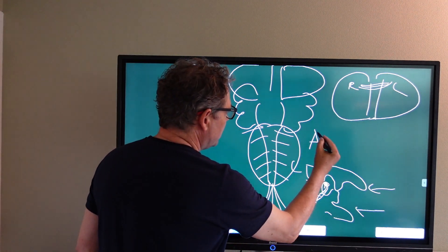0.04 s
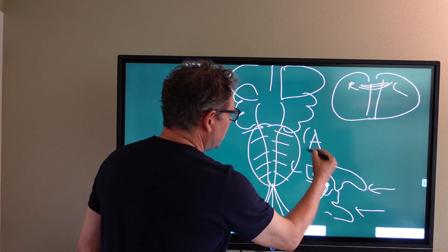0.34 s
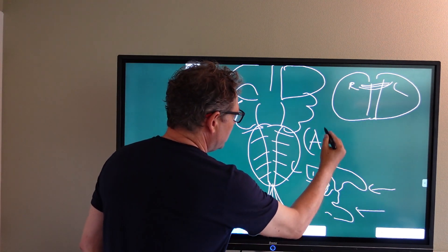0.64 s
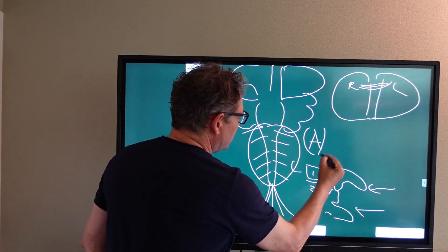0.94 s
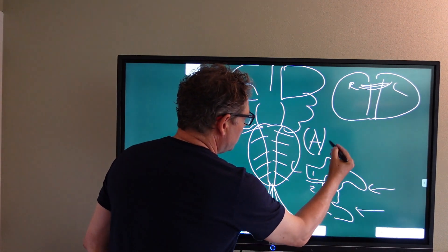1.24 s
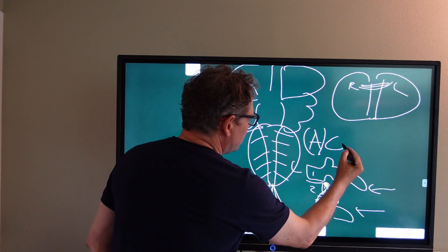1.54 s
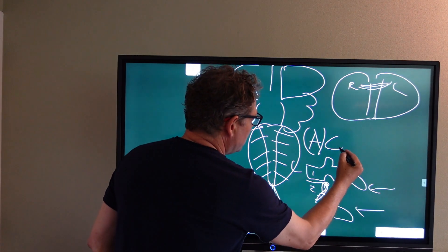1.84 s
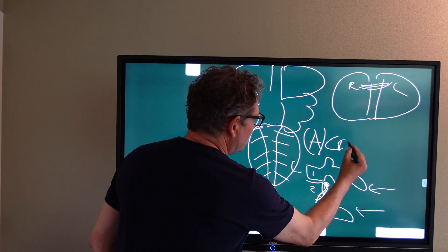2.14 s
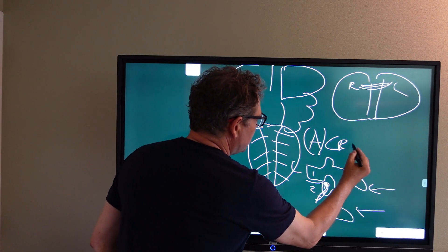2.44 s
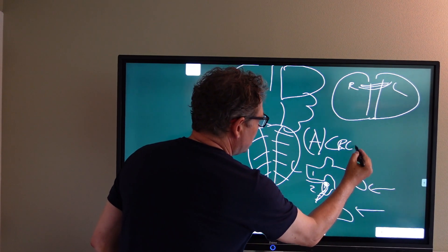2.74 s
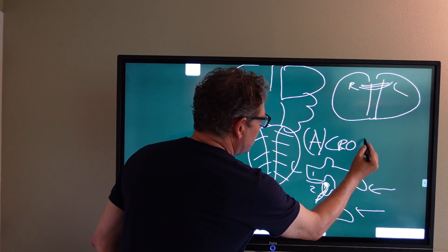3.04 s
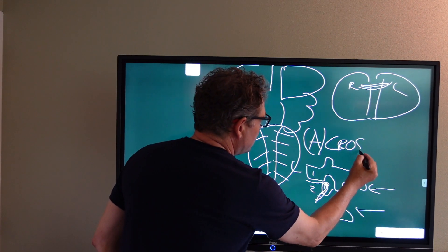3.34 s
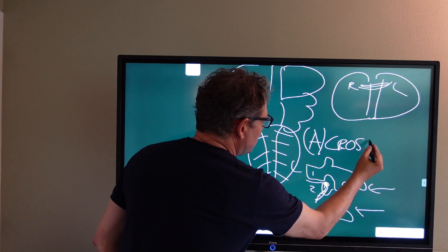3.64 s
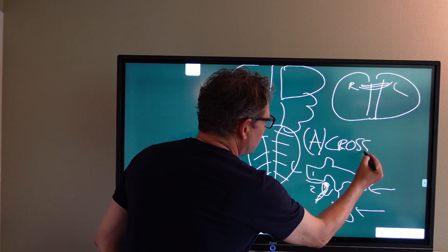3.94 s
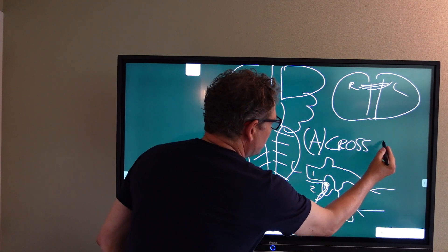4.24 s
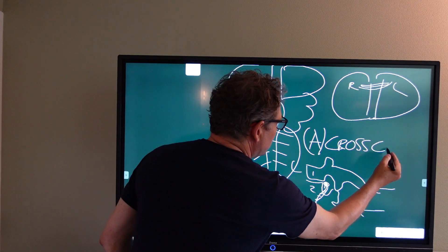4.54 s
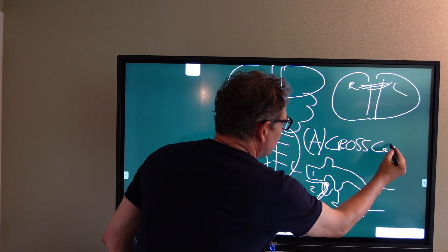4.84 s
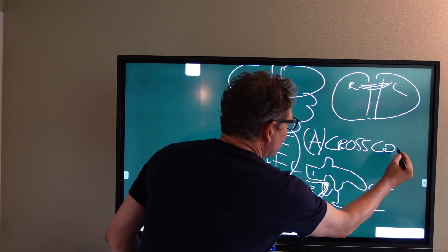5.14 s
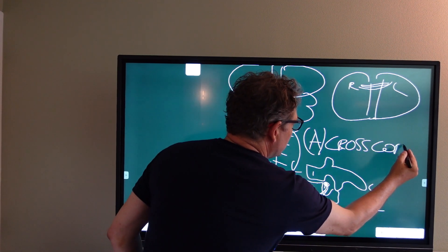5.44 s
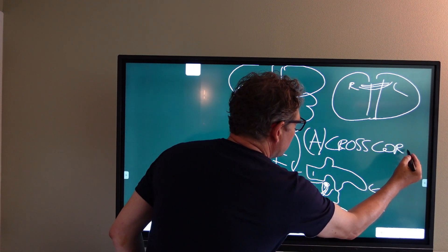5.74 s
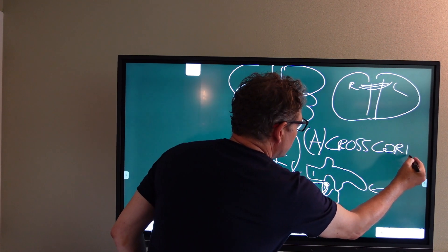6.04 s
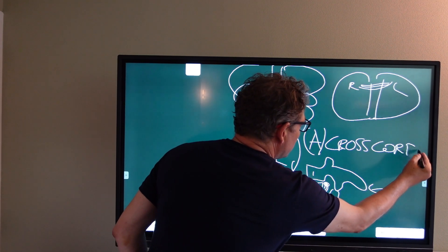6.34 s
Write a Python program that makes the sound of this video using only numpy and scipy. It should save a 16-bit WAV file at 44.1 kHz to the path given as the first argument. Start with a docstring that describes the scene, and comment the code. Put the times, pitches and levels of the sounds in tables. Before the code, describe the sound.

In a small bare room, a plastic stylus taps out handwriting on a big glass screen. About a dozen clicking knocks make the panel ring briefly, and thin, hissing strokes follow them, with a tiny squeak or two. The taps come quicker at first, then space out around longer strokes. Heard in stereo, with close wall reflections and a short echo, over faint steady room hum and microphone hiss.

```python
"""A hard plastic pen writes letters on the glass of a large wall display, in a small bare room.
Each touch knocks the panel, ticks the nib and pings the barrel; then the nib scrapes until it lifts.
A stereo microphone hears it first straight off the glass and the nearby walls, then from the whole
room, which answers for half a second. Behind it all lie a faint hum and hiss."""
import sys
import numpy as np
from scipy import signal
from scipy.fft import rfft, irfft, next_fast_len
from scipy.io import wavfile
from scipy.ndimage import map_coordinates

SR = 44100
rng = np.random.default_rng(int(sys.argv[2]) if len(sys.argv) > 2 else 0)


def generate_wav(sig):
    """Save sig (samples, or channels by samples) to the path in sys.argv[1] as 16-bit PCM at SR."""
    pcm = np.round(np.clip(np.atleast_2d(sig).T, -1, 1) * 32767).astype(np.int16)
    wavfile.write(sys.argv[1], SR, pcm)


N = 286283
RING = 32768  # samples allowed for a touch to die away
TIME, RING_HZ = np.arange(N) / SR, np.fft.rfftfreq(RING, 1 / SR)

# The pen lands on the glass, then slides. Levels are relative, each within its column:
# t/s, knock/dB, thud/dB, barrel/dB, nib/dB, slide length/s, scrape/dB, barrel ring/dB, squeak/dB
TOUCHES = [(-0.2, -42.5, -2.5, -46, -48.5, 0, -60, -2, 0),
           (0.2187, -41, -0.5, -43, -50, 0.22, -55, -4.5, 0.5),
           (0.6828, -41, -1.5, -45.5, -48.5, 0.22, -55, -4.5, 1),
           (1.2072, -44.5, -0.5, -45, -51, 0.22, -59, -2, -2.5),
           (1.415, -55.5, -1, -71, -59, 0.055, -53.5, -1, -4),
           (1.808, -39.5, 0, -39.5, -47, 0.11, -60, 5.5, -2),
           (2.041, -44.5, -1.5, -47.5, -57, 0.35, -61, -1.5, -3.5),
           (2.5704, -43.5, 1, -42, -48.5, .33, -58.5, -6, -5.5),
           (3.082, -45.5, 3.5, -40.5, -48, 0.38, -60.5, -14, -4.5),
           (3.6475, -46.5, 4, -41.5, -48.5, .35, -61, -5, -5.5),
           (4.2695, -43.5, 3.5, -39, -44.5, .685, -59, -0.5, -2.5),
           (5.114, -38, -2, -34, -39.5, 0.58, -60, -1, -3.5),
           (5.8867, -39.5, -5.5, -41, -45.5, 0.15, -57.5, -6, -5),
           (6.236, -39, -2.5, -41, -47.5, 0.29, -58.5, -6.5, -2)]
def taps(modes_db=-4):
    """Each touch excites panel, barrel and nib; they reach the microphone by short paths and the room."""
    track = np.zeros((2, N))
    ping, tick = barrel_ping(), nib_tick()
    for s, knock_db, thud_db, barrel_db, nib_db, *_ in TOUCHES:
        knock = panel_knock(thud_db, nib_db - knock_db)
        knock_near, barrel_near, nib_near = early_paths()
        room = rfft(room_tail())
        spectrum = amp(knock_db) * knock * (amp(31) * knock_near + amp(36) * room)
        spectrum += amp(barrel_db) * ping * (amp(31) * barrel_near + amp(27) * room)
        spectrum += amp(nib_db) * tick * (amp(34) * nib_near + amp(38) * room)
        wave = irfft(spectrum) + amp(knock_db + modes_db) * panel_ring()
        add(track, s, wave[:, :RING - 1024])
    return track


# Spectrum of a knock on the panel: f/Hz, relative level/dB
KNOCK_SPECTRUM = [(30, -57), (70, -19), (130, -17.5), (230, -6), (300, -9), (460, -2.5), (610, 2.5),
                  (850, -12.5), (1130, -4), (1500, -8.5), (1950, -17), (2280, -14), (2800, -21.5),
                  (5000, -55.5)]
def panel_knock(thud_db, nib_over_knock_db):
    """The panel's response; where and how hard the pen lands tilts its bass and treble."""
    panel = unit(amp(along(KNOCK_SPECTRUM, RING_HZ)))
    bass = along([(300, 1), (480, 0.22)], RING_HZ)
    treble = along([(700, 0.13), (1000, 1)], RING_HZ)
    hardness_db = 2.04 + 0.25 * thud_db + 0.27 * nib_over_knock_db
    return causal(panel * amp(thud_db * bass + hardness_db * treble))


# Low modes that ring on after a knock: f/Hz, relative level/dB, t60/s
LOW_MODES = [(108.4, -19.5, 0.76), (134.3, -11.5, 0.65), (214.3, -7.5, 0.59), (251.5, -2, 0.31),
             (347, -2, 0.56), (442.6, 1, 0.37), (484, 0.5, 0.4), (528, 0, 0.38), (550, -12, 0.22),
             (602, -2, 0.37), (653, 1, 0.26), (1030, 1, 0.32), (1276, 3.5, 0.34), (1444, -3, 0.18),
             (1620, -7, 0.15), (2303, -8.5, 0.45)]
def panel_ring(swell_s=0.028, scatter_db=3.5):
    """The low modes swell and ring at new strengths for each touch."""
    t, modes = TIME[:RING], np.zeros(RING)
    for hz, db, t60 in LOW_MODES:
        decay = amp(db + rng.normal(0, scatter_db) - 60 * t / t60)
        modes += decay * np.sin(2 * np.pi * (hz * t + rng.random()))
    return modes * (1 - np.exp(-t / swell_s))


# Resonances of the pen's barrel: f/Hz, half-width/Hz, relative level/dB
BARREL_MODES = [(7039, 210, -2.5), (7640, 370, -6.5)]
def barrel_ping():
    """The plastic barrel's response: a brief, high ring when the pen lands."""
    peaks = sum(amp(db) / (1 + ((RING_HZ - hz) / width) ** 2) for hz, width, db in BARREL_MODES)
    return causal(unit(peaks))


# Spectrum of the nib striking glass: f/Hz, relative level/dB
TICK_SPECTRUM = [(1500, -37.5), (3300, -1), (4500, 4.5), (5700, 10), (6400, 7), (8100, 12.5), (9000, 2),
                 (9900, 6), (11100, 5.5), (12100, -2.5), (12800, 3.5), (14000, -14), (16000, 0)]
def nib_tick():
    """The hard nib's response: a sharp, bright tick."""
    return causal(unit(amp(along(TICK_SPECTRUM, RING_HZ))))


def writing(direct_db=-5, room_db=-3):
    """The sliding pen, heard directly in the centre and from the walls all round."""
    direct = scraping() + chirps()
    walls = signal.fftconvolve(direct[None], room_tail(), axes=1)[:, :N]
    return amp(direct_db) * direct + amp(room_db) * walls


# Spectrum of the nib sliding on glass: f/Hz, relative level/dB
SCRAPE_SPECTRUM = [(150, -8), (550, 0.5), (1300, -2.5), (3100, -9), (4000, -5), (5200, -7), (6400, -3),
                   (7500, 4.5), (8700, -1), (10800, 3), (12000, 3), (13300, 2.5), (14200, -14),
                   (16000, -3.5)]
# The sliding nib's resonances, pen upright: f/Hz, width/Hz, relative level/dB
NIB_MODES = [(4480, 280, -8), (5700, 340, -7.5), (9760, 550, -4), (13200, 480, -10)]
def scraping(pressure_db=1, grain_db=4, sway_hz=170, flicker_db=3):
    """While the nib is down, tiny slips hiss on the glass and keep nib and barrel ringing."""
    force, ring_db, squeak_db, lean_hz = hand()
    force = force * amp(pressure_db * wobble(30))
    slips = rng.standard_normal(N) * amp(grain_db * wobble(900))
    hiss = unit(filtered(slips, lambda hz: amp(along(SCRAPE_SPECTRUM, hz))))
    # leaning moves all the nib's resonances together; more drag favours the two low ones
    shift_hz = lean_hz + sway_hz * wobble(12)
    modes = [amp(db + flicker_db * wobble(14)) * resonance(hz + shift_hz, width)
             for hz, width, db in NIB_MODES]
    nib = amp(squeak_db + 3) * sum(modes[:2]) + sum(modes[2:])
    # steady rubbing feeds only the barrel's main resonance
    barrel = amp(ring_db - 1) * resonance(BARREL_MODES[0][0], width_hz=210)
    return force * (hiss + nib + barrel)


def hand(bend_s=0.105, flick_s=0.051, grip_s=0.012):
    """Each slide presses harder towards its end and speeds up once for each bend of a letter."""
    force, ring_db, squeak_db, lean_hz = np.zeros((4, N))
    for s, *_, length, scrape_db, base_ring_db, base_squeak_db in TOUCHES:
        down = (TIME > s) & (TIME < s + length)
        t = TIME[down] - s
        progress = t / length - 0.5  # zero at mid-stroke
        speed = np.cos(2 * np.pi * (length - flick_s - t) / bend_s)  # last peak: flick_s before the lift
        grip = np.clip(np.minimum(t, length - t) / grip_s, 0, 1)
        force[down] = grip * amp(scrape_db + 0.5 * progress + 1.6 * speed)
        ring_db[down] = base_ring_db + 3.2 * speed
        squeak_db[down] = base_squeak_db - 4.5 * progress
        lean_hz[down] = 30.1 - 300 * progress
    return force, ring_db, squeak_db, lean_hz


# The nib catches on the glass: t/s, f/Hz, relative level/dB, length/s
CHIRPS = [(1.805, 11050, -45.5, 0.035), (3.424, 6050, -50.5, 0.01)]
def chirps(width_hz=800):
    """Brief squeaks where the nib sticks and slips."""
    swell = lambda s, length: np.sin(np.pi * np.clip((TIME - s) / length, 0, 1) ** 0.5)
    return sum(amp(db) * swell(s, length) * resonance(hz, width_hz) for s, hz, db, length in CHIRPS)


def resonance(pitch_hz, width_hz):
    """Random slips keep a resonance ringing, rms 1; its pitch may move."""
    a, b = filtered(rng.standard_normal((2, N)), lambda hz: 1 / (1 + (hz / width_hz * 1.5) ** 2))
    phase = 2 * np.pi * np.cumsum(pitch_hz * np.ones(N)) / SR
    return unit(a * np.cos(phase) + b * np.sin(phase))


# Paths to the microphone off the glass and nearby walls, up to about 4 m longer than the direct one:
# delay/s, then relative levels: knock/dB, barrel/dB, nib/dB
PATHS = [(0, -1.5, -11, -1), (.0019, -4, 1, 0), (.0027, 1.5, 1, 2), (.0035, -4.5, 4.5, 1),
         (.0056, -6, 9, 3), (.0069, 0.5, -5, 3.5), (0.0126, -9, -17, -25)]
def early_paths(scatter_db=2, scatter_s=0.000161, left_right_s=0.000005):
    """Stereo responses for knock, barrel and nib; the paths shift as the pen moves."""
    delay, *levels = np.transpose(PATHS)
    chance = rng.standard_normal((len(PATHS), 5))
    reflected = np.arange(len(PATHS)) > 0
    delay = np.abs(delay + scatter_s * chance[:, 0] * reflected)
    arrival = delay + left_right_s * np.array([[1], [-1]]) * chance[:, 1]
    gains = amp(np.array(levels) + scatter_db * chance[:, 2:].T)
    gains = gains / np.linalg.norm(gains, axis=1, keepdims=True)
    lags = np.exp(-2j * np.pi * arrival[..., None] * RING_HZ)
    return np.einsum("sp,cpf->scf", gains, lags)  # source, path, channel, frequency


# Decay of the small bare room: f/Hz, t60/s
ROOM_DECAY = [(100, 0.81), (260, 0.6), (700, 0.43), (1800, 0.48), (5000, 0.56), (8000, 0.41), (14000, 0.57)]
# The sound fills the room before it fades: f/Hz, hold/s
ROOM_HOLD = [(300, 0.054), (1500, 0.034), (5000, 0.018), (14000, 0.012)]
# The room's tail at the microphone: f/Hz, left-right correlation
ROOM_LIKENESS = [(100, 0.98), (600, 0.94), (1200, 0.75), (2300, 0.56), (5000, 0.6), (7000, 0.69),
                 (12000, 0.54)]
def room_tail(build_s=0.0027, dull_hz=13000):
    """A stereo tail of energy 1; each frequency holds briefly, then dies at its own speed."""
    hz, t, noise = signal.stft(rng.standard_normal((2, RING)), SR, nperseg=256)
    hold = along(ROOM_HOLD, hz)[:, None]
    fade = amp(-60 * (np.hypot(t, hold) - hold) / along(ROOM_DECAY, hz)[:, None])
    fade = fade / np.sqrt(1 + (hz[:, None] / dull_hz) ** 4)  # the walls soak up the highest treble
    tail = signal.istft(noise * fade, SR, nperseg=256)[1][:, :RING]
    tail = spread(tail, ROOM_LIKENESS) * (1 - np.exp(-TIME[:RING] / build_s)) ** 2
    return tail / np.linalg.norm(tail[0])


# Spectrum of the quiet room: f/Hz, relative level/dB
AIR_SPECTRUM = [(25, -25), (70, 0.5), (110, -2.5), (200, -1), (350, -4.5), (600, -1), (850, -4.5),
                (1100, -6.5), (1800, -9.5), (3000, -14), (7000, -20), (11000, -21.5), (13500, -21),
                (15500, -37)]
# Both channels share the rumble, while microphone hiss is unrelated: f/Hz, left-right correlation
AIR_LIKENESS = [(110, 0.86), (220, 0.075), (1000, 0.017), (15000, 0.18)]
# Faint steady tones in the room: f/Hz, level/dB
HUM_TONES = [(97, -77), (1098, -88)]
def room_tone(air_db=-65, waver_db=2):
    """Steady air noise and microphone hiss with a faint wavering hum."""
    noise = spread(rng.standard_normal((2, N)), AIR_LIKENESS)
    air = unit(filtered(noise, lambda hz: amp(along(AIR_SPECTRUM, hz))))
    hum = np.zeros(N)
    for hz, db in HUM_TONES:
        peak = np.sqrt(2) * amp(db + waver_db * wobble(4.22))
        hum += peak * np.sin(2 * np.pi * hz * TIME + wobble(3))
    return amp(air_db) * air + hum


def amp(db):
    """Decibels to gain."""
    return 10 ** (np.asarray(db) / 20)


def unit(x):
    """Scale to rms 1."""
    return x / np.sqrt(np.mean(x ** 2) + 1e-20)


def along(points, hz):
    """(f/Hz, value) points read on a log axis."""
    f, v = np.transpose(points)
    return np.interp(np.log(hz + 1), np.log(f + 1), v)


def wobble(rate):
    """A smooth random curve, rate knots a second."""
    return map_coordinates(rng.standard_normal(int(N * rate / SR) + 4), [TIME * rate])


def filtered(x, response):
    """Shape x by a response of frequency."""
    n = x.shape[-1]
    m = next_fast_len(n + 8192)
    return irfft(rfft(x, m) * response(np.fft.rfftfreq(m, 1 / SR)), m)[..., :n]


def causal(gain):
    """The response with this gain that starts at once and then dies away."""
    cepstrum = irfft(np.log(np.maximum(gain, 1e-6)))
    cepstrum[1:RING // 2] *= 2
    cepstrum[RING // 2 + 1:] = 0
    return np.exp(rfft(cepstrum))


def add(track, s, sound):
    """Mix a sound into the track at time s."""
    start = round(s * SR)
    part = sound[:, max(-start, 0):N - start]
    track[:, max(start, 0):][:, :part.shape[1]] += part


def spread(pair, likeness):
    """Two unrelated signals become left and right, with a likeness for each frequency."""
    turn = lambda hz: np.arccos(np.clip(along(likeness, hz), -1, 1)) / 2
    mid, side = filtered(pair, lambda hz: np.array([np.cos(turn(hz)), np.sin(turn(hz))]))
    return np.array([mid + side, mid - side])


def scene():
    """Taps and strokes in front, room tone behind."""
    return taps() + writing() + room_tone()


def record(dry, top_hz=15850):
    """The camera keeps nothing from its microphone above its band limit."""
    return filtered(dry, lambda hz: 1 / np.sqrt(1 + (hz / top_hz) ** 200))


dry = scene()
out = record(dry)
generate_wav(out)
```